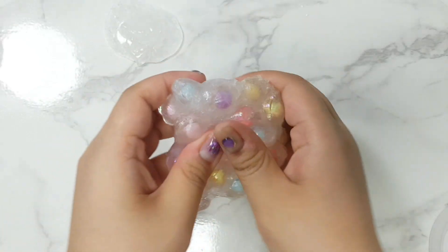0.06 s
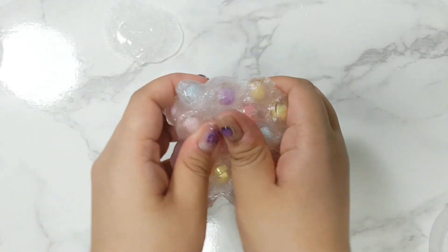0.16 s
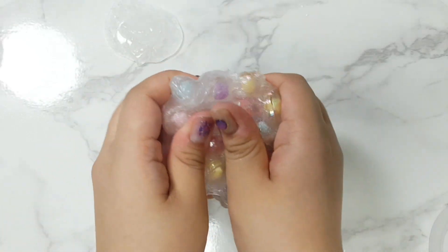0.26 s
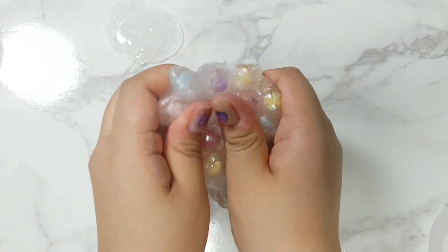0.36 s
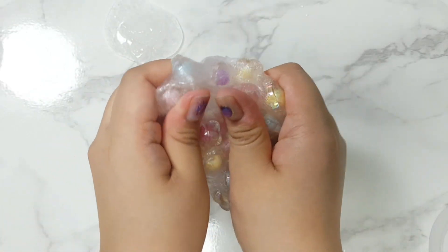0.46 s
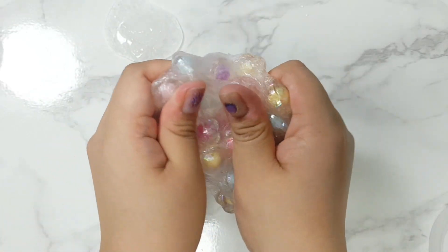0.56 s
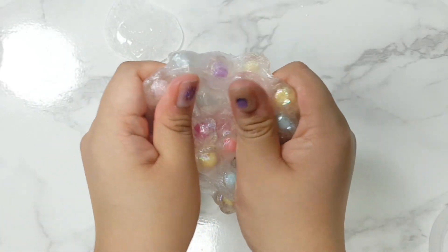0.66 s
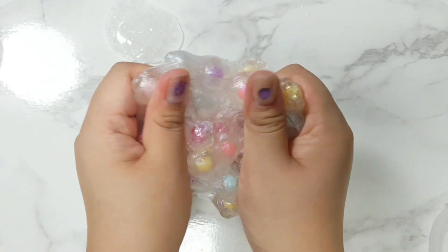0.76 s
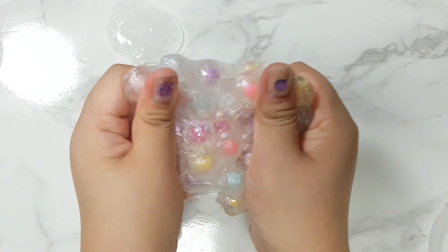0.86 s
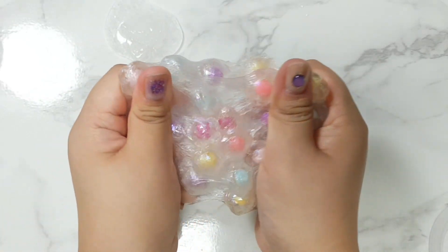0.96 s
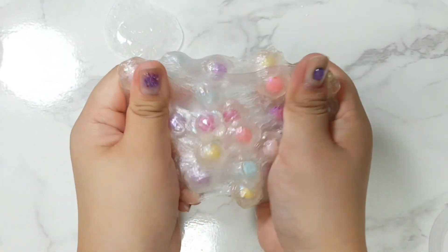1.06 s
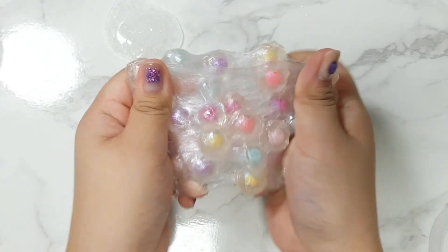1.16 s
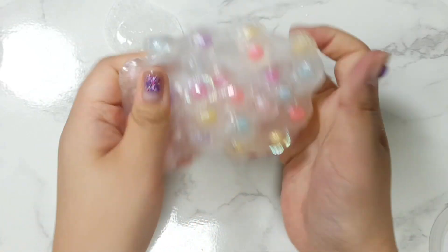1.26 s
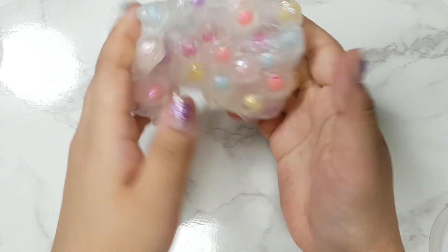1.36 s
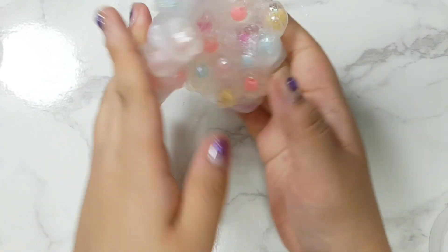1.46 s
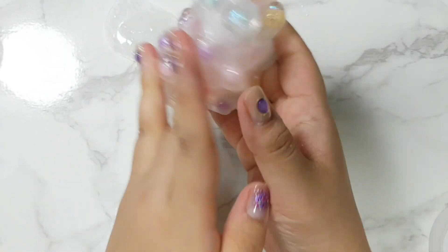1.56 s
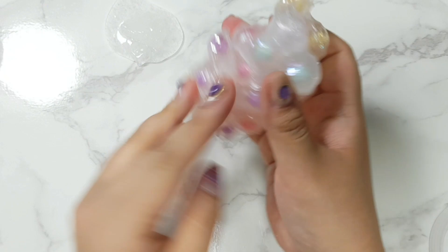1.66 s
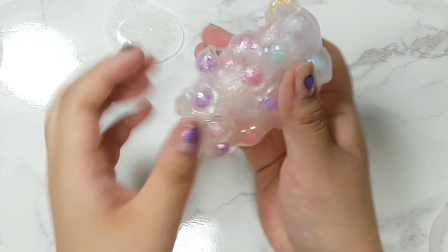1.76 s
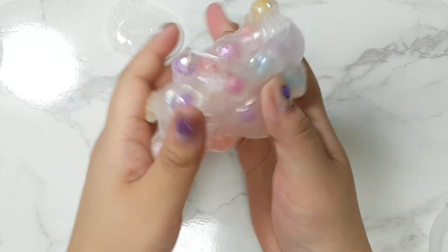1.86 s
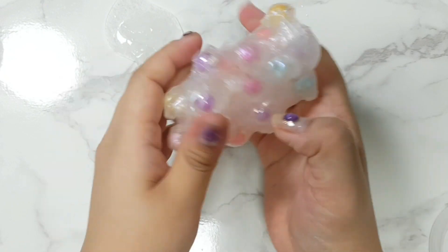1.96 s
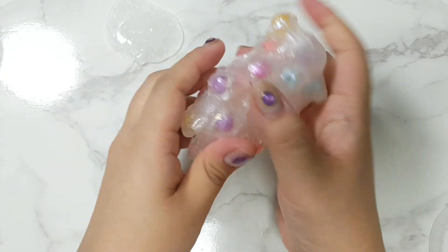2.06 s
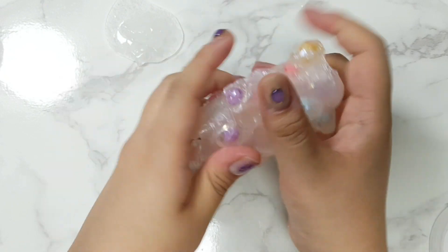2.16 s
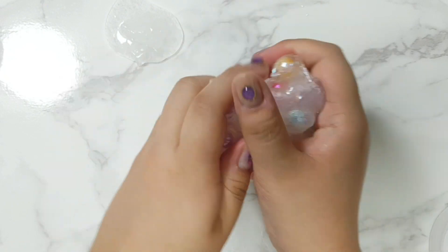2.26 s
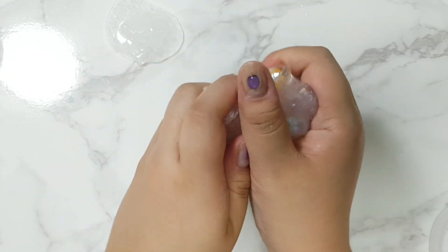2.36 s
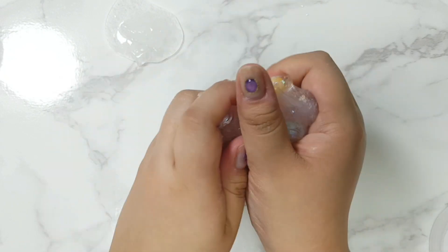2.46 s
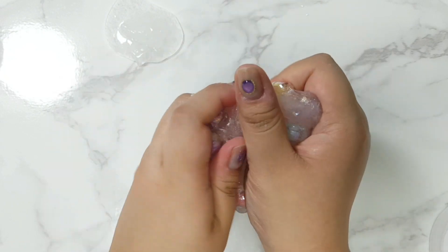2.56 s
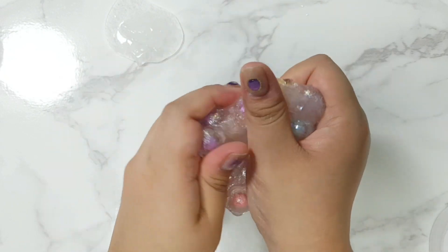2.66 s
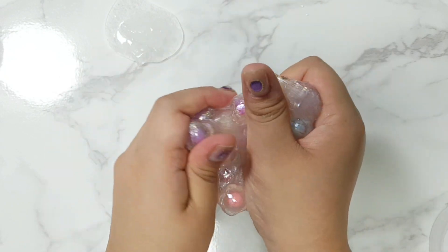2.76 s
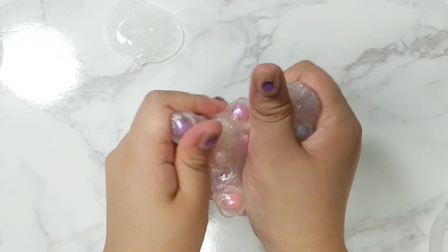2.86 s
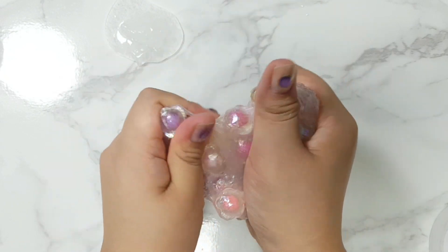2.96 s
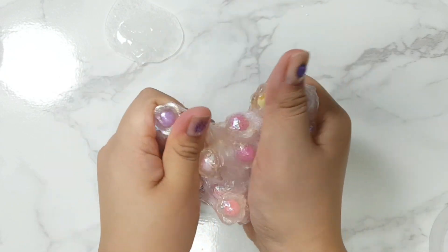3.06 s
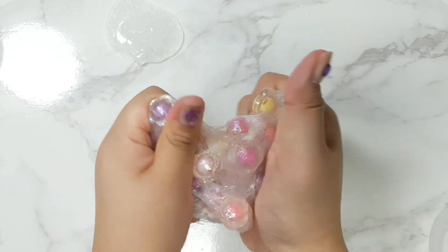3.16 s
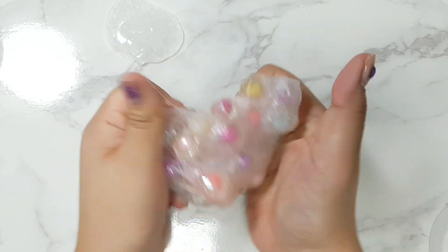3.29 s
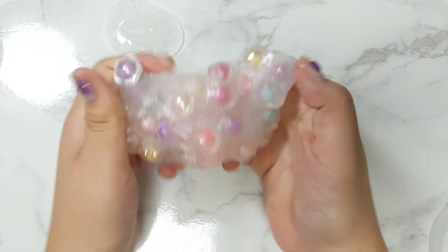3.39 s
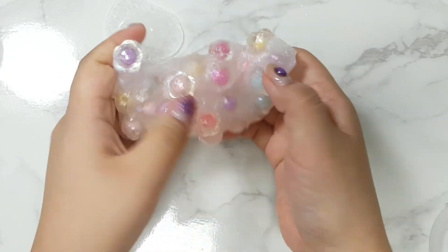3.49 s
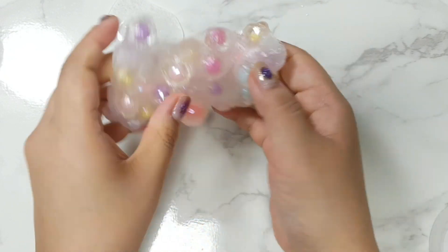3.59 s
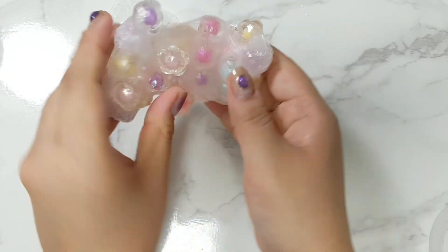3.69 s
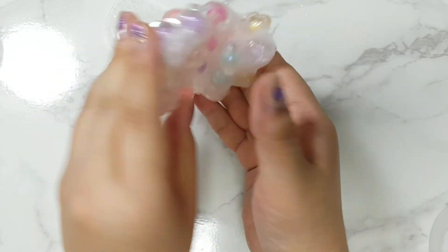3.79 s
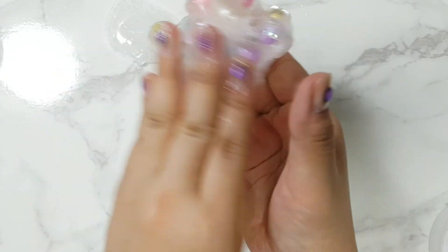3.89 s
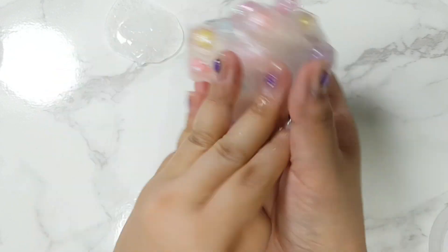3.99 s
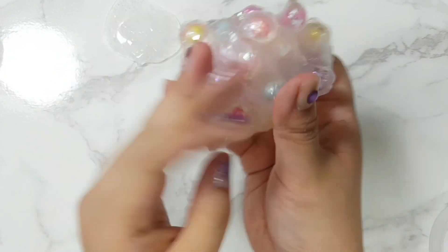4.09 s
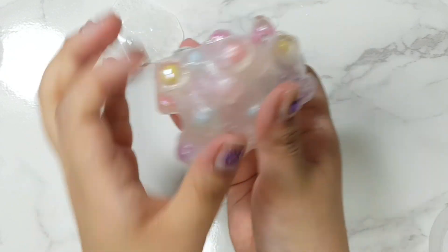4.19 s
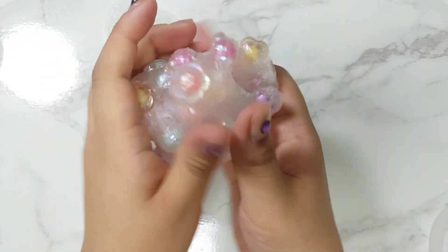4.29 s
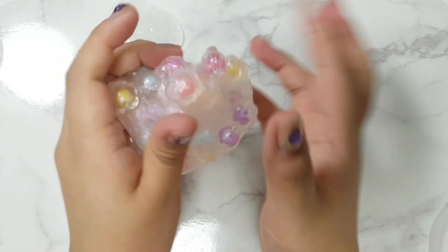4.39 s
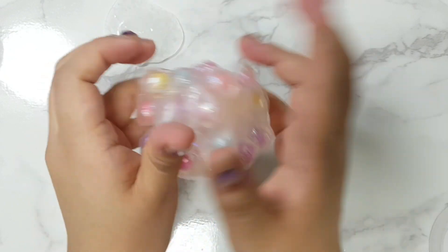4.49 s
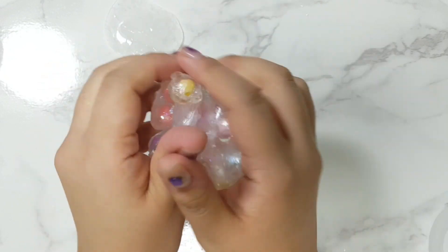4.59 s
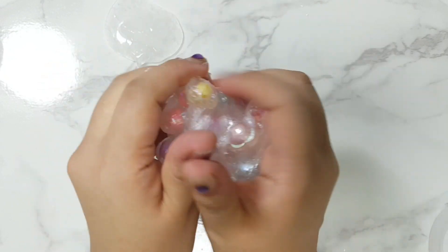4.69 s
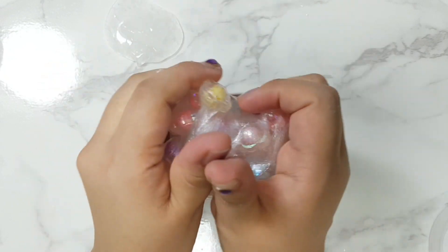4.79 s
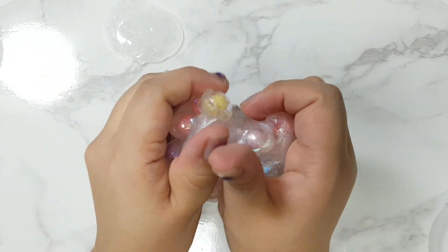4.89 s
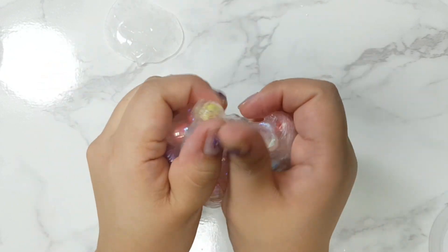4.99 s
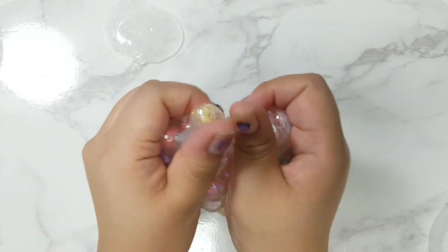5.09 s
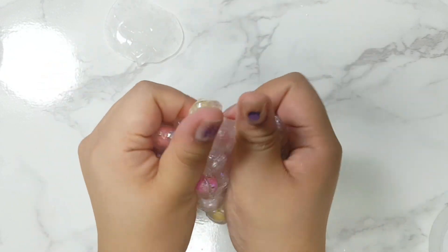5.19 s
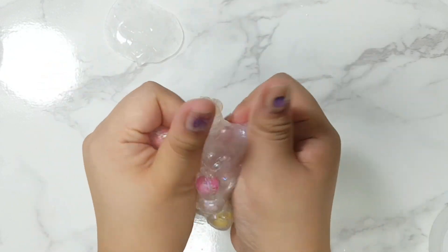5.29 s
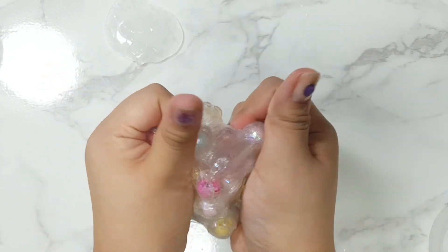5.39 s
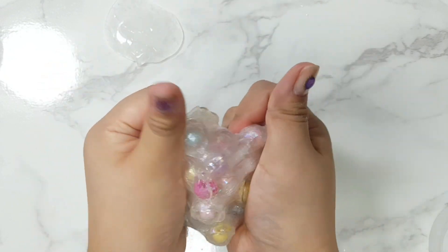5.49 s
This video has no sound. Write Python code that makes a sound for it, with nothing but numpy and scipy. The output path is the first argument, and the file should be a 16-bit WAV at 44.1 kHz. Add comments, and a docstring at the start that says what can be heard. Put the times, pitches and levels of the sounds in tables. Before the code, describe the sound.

Hands squeeze bead-filled slime three times up close, each squeeze a dense burst of crunchy wet crackles and pops, with near-quiet gaps between.

```python
"""Bead-filled slime squeezed by hand

Two hands squeeze a lump of bead-filled slime three times, close to a stereo microphone in a small room.
Trapped air bursts in pops: the film snaps and the pocket behind it rings for a millisecond or two.
Tiny bubbles, drawn as swarms of damped resonances, crackle and fizz; deep pockets squelch and plop.
Each squeeze tightens, holds and relaxes; open hands hush it. Coloured noise gives the peeling of sticky
skin, short swishes and a faint, narrow tone near 4.4 s. A diffuse room tail, hiss and a low hum surround it."""
import sys
import numpy as np
from scipy import signal
from scipy.fft import rfft, irfft
from scipy.io import wavfile

SR = 44100
rng = np.random.default_rng(int(sys.argv[2]) if len(sys.argv) > 2 else 0)


def pcm_store(signal):
    """Save signal as 16-bit PCM."""
    levels = np.round(np.clip(np.atleast_2d(signal), -1, 1) * 32767)
    wavfile.write(sys.argv[1], SR, levels.astype(np.int16).T)


N = 244314
TOP_HZ = 15800  # upper limit of bubble pitch and of the recorder


def undb(db):
    """Decibels to gain."""
    return 10 ** (np.asarray(db) / 20)


def unit(x):
    """Scale each row to unit energy."""
    return x / np.sqrt(np.sum(x ** 2, axis=-1, keepdims=True))


def colour(points, hz, axis=1):
    """Read one column of a table along a log-frequency axis."""
    table = np.array(points, float)
    return np.interp(np.log(np.maximum(hz, 1)), np.log(table[:, 0]), table[:, axis])


def wander(count):
    """Random values joined by straight lines across the scene."""
    return np.interp(np.arange(N), np.linspace(0, N, count), rng.standard_normal(count))


def swell(middle_s, half_s):
    """A smooth rise and fall around one moment."""
    return np.exp(-((np.arange(N) / SR - middle_s) / half_s) ** 2)


def noise(gain, side_db):
    """Stereo noise of rms 1 with the given gain at each frequency; side_db sets side against mid."""
    mid, side = rfft(rng.standard_normal((2, N))) * gain
    side = side * undb(side_db)
    return unit(irfft(np.array([mid + side, mid - side]), N)) * np.sqrt(N)


def capsules(pair, f, apart_hz):
    """Two unrelated spectra become left and right: long waves reach both capsules alike."""
    side = f / np.hypot(f, apart_hz)
    signs = np.array([[1], [-1]])
    return (pair[..., :1, :] + signs * side * pair[..., 1:, :]) / np.sqrt(1 + side ** 2)


def ring(hz, half_width, muffle_hz=30000, size=512):
    """One row per bubble: a heavily damped resonance that swells for a cycle, dulled by slime; unit energy."""
    f = np.maximum(np.fft.rfftfreq(size, 1 / SR), 1)
    hz, half_width = hz[:, None], half_width[:, None]
    resonance = (1 + 1j * (f ** 2 - hz ** 2) / (2 * half_width * f)) ** -2.
    dull = 1j * f / muffle_hz
    return unit(irfft(resonance / (1 + np.sqrt(2) * dull + dull ** 2)))


def scatter(rings, pan_db, near_db=-6, near_s=.0026, lag_s=.00002, wander_s=.00003, apart_hz=1800, size=640):
    """Each burst reaches the two capsules directly, then off fingers and table top by paths of its own."""
    t, f = np.arange(size) / SR, np.fft.rfftfreq(size, 1 / SR)
    chance = rng.standard_normal((len(rings), 2, size))
    echoes = unit(chance * t * np.exp(-2 * t / near_s))
    paths = capsules(rfft(echoes), f, apart_hz)
    lag = np.maximum(np.array([[0], [lag_s]]) + wander_s * (2 + chance[:, :, :1]), 0)
    direct = np.exp(-2j * np.pi * f * lag)
    heard = irfft(rfft(rings, size)[:, None] * (direct + undb(near_db) * paths))
    # half the pan lifts the left, half lowers the right
    strength = np.linalg.norm(rings, axis=1)[:, None] * undb(np.outer(pan_db, [.5, -.5]))
    return unit(heard) * strength[:, :, None]


def place(times, sounds):
    """Lay short stereo sounds out in time."""
    size = sounds.shape[-1]
    out = np.zeros((2, N + size))
    for i, sound in zip(np.clip(times * SR, 0, N - 1).astype(int), sounds):
        out[:, i:i + size] += sound
    return out[:, :N]


def air(hiss_db=-69, bass_side_db=-6, treble_side_db=-2, hum_hz=59, hum_db=-72.5, hum_waver_db=2):
    """Faint rumble and hiss of the still room, with a low hum that wavers in level."""
    # colour of the still air: (frequency [Hz], relative density [dB per Hz])
    air_colour = [(20, -19.5), (50, -3), (85, -3), (120, -4), (200, -13), (340, -17.5), (560, -22.5),
                  (1000, -22.5), (1600, -22), (2500, -24.5), (5000, -28.5), (9000, -29), (16000, -33.5)]
    f = np.fft.rfftfreq(N, 1 / SR)
    side_db = colour([(300, bass_side_db), (4000, treble_side_db)], f)
    hiss = noise(undb(colour(air_colour, f)), side_db)
    hum_gain = undb(hum_db + hum_waver_db * wander(count=40))
    hum = hum_gain * np.sin(2 * np.pi * hum_hz * np.arange(N) / SR)
    return undb(hiss_db) * hiss + hum


def kneading():
    """Effort in dB behind squelch, crackle and fizz: squeezes rise, hold and relax; open hands hush them."""
    # hands close, hold and relax: (full grip [s], relaxing from [s], crackle effort [dB],
    # squelch against it [dB], fizz against it [dB])
    squeezes = [(0.258, 0.778, -49.5, -13, -11.5), (2.448, 2.969, -49.5, -13.5, -14.5),
                (4.948, 5.419, -49.5, -5.5, -19)]
    # a thumb digs deeper or eases off: (middle [s], half-length [s], change of effort [dB])
    pushes = [(0.438, 0.039, 5), (0.72, .025, -5.5), (1.07, .04, -4), (1.19, 0.023, -10),
              (2.66, 0.08, -4.5), (2.886, 0.033, 3), (3.12, 0.044, -5.5), (3.22, 0.054, 10.5),
              (5.32, .05, 5)]
    # the hands open to turn the lump over: (from [s], until [s])
    turns = [(1.42, 2.5), (3.64, 4.8)]
    # fingers lift off the sticky skin: (middle [s], half-length [s], fizz effort [dB])
    lifts = [(1.315, 0.13, -62), (1.74, .1, -76.5), (1.955, 0.04, -68), (2.067, .07, -78),
             (3.958, 0.11, -72), (4.152, 0.046, -67), (4.36, 0.1, -74), (4.53, 0.046, -74),
             (4.762, 0.046, -71.5)]
    grip_db_per_s, relax_db_per_s = 148, 32.5
    # the deep pockets answer later and fall quiet as soon as the pressure eases
    squelch_lag_s, squelch_rise_db_per_s, squelch_fall_db_per_s = 0.062, 220.5, 109
    # the fine fizz lingers while the slime swells back
    fizz_rise_db_per_s, fizz_fall_db_per_s = 121, 10
    open_s, open_db = .07, -17.5
    lift_crackle_db = -3  # crackle of a lift against its fizz

    t = np.arange(N) / SR
    squelch = crackle = fizz = 0
    for grip, relax, db, depth_db, fizz_db in squeezes:
        before, after = np.maximum(grip - t, 0), np.maximum(t - relax, 0)
        deep_before = np.maximum(grip + squelch_lag_s - t, 0)
        crackle = crackle + undb(db - grip_db_per_s * before - relax_db_per_s * after)
        fizz = fizz + undb(db + fizz_db - fizz_rise_db_per_s * before - fizz_fall_db_per_s * after)
        squelch = squelch + undb(db + depth_db - squelch_rise_db_per_s * deep_before
                                 - squelch_fall_db_per_s * after)
    opened = sum(np.clip(np.minimum(t - start, end - t) / open_s, 0, 1) for start, end in turns)
    push_db = sum(db * swell(s, half) for s, half, db in pushes)
    hands = undb(push_db + open_db * opened)
    lift = sum(undb(db) * swell(s, half) for s, half, db in lifts)
    crackle = np.hypot(crackle * hands, undb(lift_crackle_db) * lift)
    return 20 * np.log10([squelch * hands, crackle, np.hypot(fizz * hands, lift)])


def swishes(side_db=-6, rough_db=3):
    """Swishes of rough noise, each in a resonant band, and near 4.4 s a faint, narrow tone around 1500 Hz."""
    # band-shaped noise that falls to exp(-2) one length from its middle:
    # (middle [s], length [s], pitch [Hz], width [Hz], level [dB])
    noise_bands = [(0.092, 0.053, 2700, 514, -57.5), (1.293, 0.039, 930, 500, -63.5),
                   (1.584, 0.047, 2240, 520, -54.5), (1.75, 0.19, 1840, 607, -69.5),
                   (1.973, 0.028, 1930, 504, -62), (2.415, 0.046, 1820, 510, -47),
                   (2.449, 0.021, 1430, 453, -46), (2.481, 0.035, 1240, 300, -44),
                   (3.53, 0.19, 1030, 500, -76.5), (3.629, 0.029, 3070, 2540, -53.5),
                   (3.981, 0.12, 1990, 1800, -71.5), (4.14, 0.027, 3020, 2200, -62.5),
                   (4.342, 0.031, 1876, 900, -64.5), (4.416, 0.17, 1510, 160, -76),
                   (4.494, 0.033, 2900, 700, -71.5), (4.884, 0.069, 2240, 1704, -56)]
    t, f = np.arange(N) / SR, np.maximum(np.fft.rfftfreq(N, 1 / SR), 1)
    out = 0
    for s, length, hz, width, db in noise_bands:
        band = 1 / (1 + ((f ** 2 - hz ** 2) / (width * f)) ** 2)
        out = out + noise(band, side_db) * undb(db) * np.exp(-2 * ((t - s) / length) ** 2)
    return out * undb(rough_db * wander(count=1200))


def pops(rows, pocket_gain_db=16.0, muffle_hz=5800, snap_gain_db=17, tear_db=-25, low_cut_hz=800,
         pocket_pan_db=1.7, snap_pan_db=-0.9, pan_spread_db=1.5):
    """The film tears a little, then gives way with a bright snap; the opened pocket and slime around it ring."""
    body_hz, body_width_hz, body_db = 1375, 170, -13.5  # soft slime around an opened pocket
    s, hz, half_width, db, snap_hz, snap_db = np.transpose(rows)
    chance = rng.random((len(s), 3))
    pan_db = pan_spread_db * (2 * chance[:, 2] - 1)
    body = ring(body_hz * 2 ** ((chance[:, 0] - .5) / 2), np.full(len(s), body_width_hz), muffle_hz)
    pocket = unit(ring(hz, np.maximum(half_width, 100), muffle_hz) + undb(body_db) * body)
    pocket = pocket * undb(db + pocket_gain_db)[:, None]
    # a thinner film snaps higher and more briefly
    snap_width = np.interp(snap_hz, [6000, 10000], [900, 2300])
    snap = ring(snap_hz, snap_width) * undb(snap_db + snap_gain_db)[:, None]
    burst = (scatter(pocket, pan_db + pocket_pan_db, near_db=-1.5, near_s=0.0022)
             + scatter(snap, pan_db + snap_pan_db, near_db=-0.5, near_s=0.0019,
                       wander_s=.000012, apart_hz=5860))
    early = s - .0025 * chance[:, 1]
    tear = undb(tear_db) * place(early, scatter(pocket + snap, pan_db))
    # so small an opening radiates little bass
    low_cut = signal.butter(2, low_cut_hz, "high", fs=SR, output="sos")
    return signal.sosfilt(low_cut, place(s, burst) + tear)


def large_pops():
    """The larger air pockets burst one by one, each with its own pitch and film."""
    # levels are ahead of the gains in pops(): (time [s], pocket pitch [Hz], pocket half-width [Hz],
    # pocket level [dB], film snap pitch [Hz], snap level [dB])
    large_pockets = [(0.1303, 2130, 505, -25, 5700, -49.5), (0.194, 2940, 1310, -34, 5900, -63),
                     (0.2053, 2620, 620, -36.5, 9400, -41), (0.2354, 2930, 1260, -26.5, 6800, -65),
                     (0.2471, 4200, 990, -30, 7200, -62), (0.284, 3900, 1580, -22.5, 9500, -17.5),
                     (0.3117, 3210, 1230, -31.5, 9100, -34), (0.342, 2510, 1180, -31, 10900, -32),
                     (0.3932, 2530, 640, -26.5, 6100, -52), (0.3997, 5270, 980, -23.5, 8750, -25),
                     (0.4219, 2750, 706, -16.5, 6370, -40), (0.4606, 2660, 583, -17.5, 7400, -40),
                     (0.5489, 2140, 740, -26.5, 5460, -35.5), (0.5588, 1220, 660, -30.5, 7500, -45),
                     (0.5976, 2770, 1260, -28.5, 9800, -32.5), (0.6053, 4730, 1035, -33.5, 6450, -36.5),
                     (0.627, 2000, 650, -25.5, 6600, -47), (0.6653, 3500, 1300, -33, 6800, -42),
                     (0.7719, 2250, 1080, -21, 8100, -32), (0.7738, 2220, 1010, -18.5, 6270, -32),
                     (0.8312, 1710, 560, -31, 9900, -39.5), (0.8451, 5170, 860, -33, 7700, -32),
                     (0.9245, 2610, 1010, -35.5, 6600, -49), (0.9753, 4280, 1310, -39.5, 5900, -43.5),
                     (1.0085, 2930, 644, -23, 6400, -71), (1.0809, 1930, 880, -40.5, 7400, -48),
                     (1.1029, 4400, 1090, -47, 9600, -43), (1.1205, 3180, 1150, -25, 10400, -20),
                     (1.1383, 3200, 1050, -43, 8100, -34), (1.2245, 2740, 328, -28, 5600, -38.5),
                     (1.2714, 4150, 1070, -37, 7700, -36), (1.561, 3950, 1090, -31, 9800, -31.5),
                     (1.5811, 2460, 373, -32, 8100, -35), (1.83, 1960, 660, -49, 8600, -41.5),
                     (1.911, 2880, 1425, -72, 9000, -49), (1.9638, 2020, 264, -45, 8800, -47.5),
                     (2.3321, 3050, 1040, -37.5, 5920, -77.5), (2.3769, 1910, 613, -37, 6400, -57),
                     (2.4066, 2800, 745, -24.5, 6440, -75), (2.4345, 1590, 347, -28, 6200, -66),
                     (2.4663, 2070, 880, -11, 5800, -25), (2.472, 3240, 1530, -26, 6000, -55),
                     (2.5058, 3000, 760, -36, 7600, -39), (2.5339, 4120, 1130, -23, 8350, -15.5),
                     (2.5568, 2040, 494, -20, 8500, -56), (2.6348, 1800, 750, -31.5, 8400, -60),
                     (2.6451, 3740, 716, -28, 6050, -58), (2.7003, 1890, 640, -32, 5960, -68),
                     (2.729, 3480, 1020, -26, 8800, -47), (2.7524, 2680, 1110, -31, 7600, -60),
                     (2.763, 3530, 950, -28.5, 8060, -46), (2.7992, 1750, 760, -27.5, 7200, -41.5),
                     (2.8046, 2470, 890, -27, 6900, -54), (2.8516, 2730, 1530, -37.5, 6630, -36.5),
                     (2.878, 2100, 890, -26, 8300, -40), (2.884, 3700, 1570, -27.5, 8450, -22),
                     (2.9461, 3200, 1290, -31, 7340, -31.5), (2.9913, 4040, 854, -20, 5900, -59),
                     (3.0339, 2200, 730, -32, 7440, -47), (3.0569, 2100, 535, -27, 6540, -45),
                     (3.1034, 2470, 1310, -23, 8100, -47), (3.1094, 5300, 670, -31, 7700, -29),
                     (3.1642, 4150, 700, -22.5, 5860, -56), (3.1975, 2210, 1330, -22, 6800, -58),
                     (3.217, 2230, 1080, -29, 8100, -41), (3.2324, 2530, 1000, -31.5, 6500, -45),
                     (3.3163, 5000, 1040, -27, 6960, -31.5), (3.3569, 2860, 1380, -37.5, 9800, -37),
                     (3.618, 4380, 800, -45, 7400, -45), (3.6747, 4160, 818, -42.5, 6380, -35.5),
                     (3.8434, 4830, 638, -58.5, 10750, -42.5), (4.1113, 3770, 890, -44.5, 8100, -48),
                     (4.3456, 2610, 600, -47.5, 8980, -48), (4.4069, 2650, 497, -38, 7600, -46.5),
                     (4.524, 3510, 1125, -61, 9770, -54), (4.8184, 2300, 562, -31.5, 7200, -60.5),
                     (4.863, 1950, 900, -41.5, 6950, -55), (4.9063, 2250, 660, -34.5, 6400, -67),
                     (4.96, 4250, 1390, -30.5, 9700, -30), (4.998, 1650, 1310, -38.5, 10700, -34),
                     (5.0229, 1480, 594, -31.5, 7900, -49), (5.0303, 2060, 640, -30.5, 6750, -42.5),
                     (5.0557, 1650, 754, -26, 6100, -58), (5.0695, 2500, 1100, -28.5, 6640, -40.5),
                     (5.1212, 1970, 425, -24, 5900, -60), (5.1403, 2550, 1220, -29.5, 5800, -41),
                     (5.215, 2130, 880, -36, 6150, -39.5), (5.2258, 3970, 1130, -37, 10300, -35),
                     (5.246, 1610, 970, -27, 8500, -48), (5.3064, 3100, 786, -20, 6050, -41),
                     (5.3419, 4230, 1140, -32.5, 7250, -34), (5.3693, 3480, 720, -14, 7700, -25),
                     (5.3716, 2110, 880, -13, 6900, -47), (5.4856, 4970, 1130, -36, 9100, -27.5),
                     (5.5017, 1050, 487, -26, 6800, -36), (5.51, 3800, 860, -29.5, 6500, -30.5)]
    return pops(large_pockets)


def small_pops(effort_db, count=90, hz=2500, octaves=0.36, half_width_hz=700, over_crackle_db=9.5,
               spread_db=2, snap_hz=7300, snap_octaves=0.6, snap_db=-5.5, snap_spread_db=6):
    """Weak pockets burst at random moments, the stronger the harder the hands press."""
    chance = np.clip(rng.standard_normal((count, 3)), -2, 2)
    s = (np.arange(count) + rng.random(count)) / count * N / SR
    press_db = np.interp(s, np.arange(N) / SR, effort_db)
    db = press_db + over_crackle_db + spread_db * chance[:, 0]
    pitch = hz * 2 ** (octaves * chance[:, 1])
    snap_pitch = snap_hz * 2 ** (snap_octaves * chance[:, 2])
    # higher snaps are also stronger against their pocket
    snap_level = db + snap_db + snap_spread_db * chance[:, 2]
    return pops(np.c_[s, pitch, np.full(count, half_width_hz), db, snap_pitch, snap_level])


def bubbles(effort_db, shades, count, gain_db, spread_db, half_width_hz, pan_spread_db,
            firm_db=-56, light_db=-72):
    """A swarm of small bursts of random pitch: even under a light touch, with strong ones under a firm press."""
    chance = rng.random((count, 4))
    s = (np.arange(count) + 2 * chance[:, 0]) / count * N / SR
    press_db = np.interp(s, np.arange(N) / SR, effort_db)
    lowest, highest = shades[0][0], shades[-1][0]
    hz = np.minimum(lowest * (highest / lowest) ** chance[:, 1], TOP_HZ)
    firmness = np.interp(press_db, [light_db, firm_db], [.5, 1])
    # many are weak and a few strong, with a ceiling on the strongest
    luck_db = np.minimum(-spread_db * firmness * np.log(.04 + chance[:, 2]), 15)
    size = unit(undb(colour(shades, hz) + luck_db)) * np.sqrt(N) * undb(gain_db + press_db)
    rings = ring(hz, np.full(count, half_width_hz)) * size[:, None]
    return place(s, scatter(rings, pan_spread_db * (2 * chance[:, 3] - 1)))


def crackle_bubbles(effort_db):
    """Small bubbles burst in the middle register and die within a cycle or two."""
    # (pitch [Hz], relative level [dB])
    crackle_colour = [(950, -4.5), (1400, -1), (2000, 1.5), (3000, -12), (4200, -5.5), (5500, -2.5)]
    return bubbles(effort_db, crackle_colour, count=2100, gain_db=-2.0, spread_db=4.5,
                   half_width_hz=750, pan_spread_db=8.5)


def fizz_bubbles(effort_db):
    """The tiniest bubbles burst as bright, broadly damped ticks."""
    # (pitch [Hz], relative level [dB])
    fizz_colour = [(5500, 3), (7000, -16), (9000, -4), (11000, -1), (14500, -19)]
    return bubbles(effort_db, fizz_colour, count=2400, gain_db=1.5, spread_db=1.5,
                   half_width_hz=2200, pan_spread_db=0.5)


def peel(effort_db, shades, gain_db, flicker_db, side_db, growth=0.78, light_db=-66, count=900):
    """Countless threads part from the skin at once: a flickering hiss that grows more slowly than the effort."""
    # above the light touch, each dB of effort adds only growth dB
    eased_db = np.minimum(effort_db, light_db + growth * (effort_db - light_db))
    db = eased_db + gain_db + flicker_db * wander(count=count)
    return noise(undb(colour(shades, np.fft.rfftfreq(N, 1 / SR))), side_db) * undb(db)


def thick_peel(effort_db):
    """Thick threads of slime part from the skin with a mid-range hiss."""
    # (frequency [Hz], relative density [dB per Hz])
    thick_colour = [(200, -16.5), (600, -12.5), (1000, -6.5), (1800, 0), (3000, -0.5), (4500, -9),
                    (6500, -15), (10000, -27)]
    return peel(effort_db, thick_colour, gain_db=-5.5, flicker_db=2.5, side_db=-2)


def fine_peel(effort_db):
    """Fine threads part with a brighter hiss that flickers more."""
    # (frequency [Hz], relative density [dB per Hz])
    fine_colour = [(1500, -11.5), (4000, 5), (6000, -0.5), (9500, 1), (12000, -5.5), (16000, -18.5)]
    return peel(effort_db, fine_colour, gain_db=1.5, flicker_db=5.5, side_db=-1.0)


def squelch_bubbles(effort_db):
    """Pockets deep in the lump squelch under pressure, low and soon damped."""
    # (pitch [Hz], relative level [dB])
    squelch_colour = [(170, -12.5), (260, -10.5), (380, 5), (600, -2.5), (900, -6)]
    return bubbles(effort_db, squelch_colour, count=1000, gain_db=-0.5, spread_db=4,
                   half_width_hz=200, pan_spread_db=7.0)


def gulps(gain_db=14, damping=0.4):
    """Large buried pockets give way with a dull, low plop."""
    # (time [s], level ahead of gain_db [dB], pitch [Hz])
    deep_pockets = [(0.281, -37, 930), (0.547, -43, 829), (0.578, -40.5, 650), (1.121, -45.5, 751),
                    (2.556, -24.5, 983), (2.742, -36.5, 417), (2.767, -33, 410), (2.869, -33.5, 896),
                    (3.054, -34, 860), (3.202, -39.5, 330), (3.22, -40.5, 690), (4.985, -41, 400),
                    (5.273, -31, 447), (5.317, -34, 684), (5.398, -28, 547)]
    s, db, hz = np.transpose(deep_pockets)
    plops = ring(hz, damping * hz) * undb(db + gain_db)[:, None]
    return place(s, scatter(plops, 0 * s))


def room(x, first_s=0.004, apart_hz=2200, size=16384):
    """A short, diffuse tail that starts with the nearest surfaces and dies band by band."""
    # the room's answer: (band centre [Hz], level [dB], time to fall by 60 dB [s])
    room_bands = [(253.4, -9, 0.12), (912, -9.5, 0.083), (2120, -9.5, 0.13), (4150, -7, 0.15),
                  (8400, -7.5, 0.13), (13920, -7, 0.15)]
    t, f = np.arange(size) / SR, np.fft.rfftfreq(size, 1 / SR)
    echoes = capsules(rfft(rng.standard_normal((2, size))), f, apart_hz)
    tail = 0
    for (hz, db, t60), pick in zip(room_bands, np.eye(len(room_bands))):
        # each band cross-fades into its neighbours
        band = colour(np.c_[np.array(room_bands)[:, 0], pick], f)
        fade = unit(undb(-60 * t / t60) * (1 - np.exp(-(t / first_s) ** 2)))
        tail = tail + undb(db) * fade * irfft(echoes * band)
    return signal.fftconvolve(x, tail, axes=1)[:, :N]


def moving_room(x, sway_hz=0.8994):
    """The hands carry the lump about, so its echoes glide from one pattern to another."""
    angle = 2 * np.pi * sway_hz * np.arange(N) / SR
    return room(x * np.cos(angle)) + room(x * np.sin(angle))


def scene():
    """Pops, three sizes of small bubbles, peeling skin, swishes and a faint narrow tone, in the room."""
    squelch_db, crackle_db, fizz_db = kneading()
    hisses = swishes() + thick_peel(crackle_db) + fine_peel(fizz_db)
    bursts = large_pops() + small_pops(crackle_db) + gulps()
    swarms = crackle_bubbles(crackle_db) + fizz_bubbles(fizz_db) + squelch_bubbles(squelch_db)
    close_sound = hisses + bursts + swarms
    return close_sound + moving_room(close_sound) + air()


def record(dry):
    """The recorder cuts the top with a steep low-pass."""
    return signal.sosfilt(signal.ellip(8, .2, 70, TOP_HZ, fs=SR, output="sos"), dry)


dry = scene()
out = record(dry)
pcm_store(out)
```